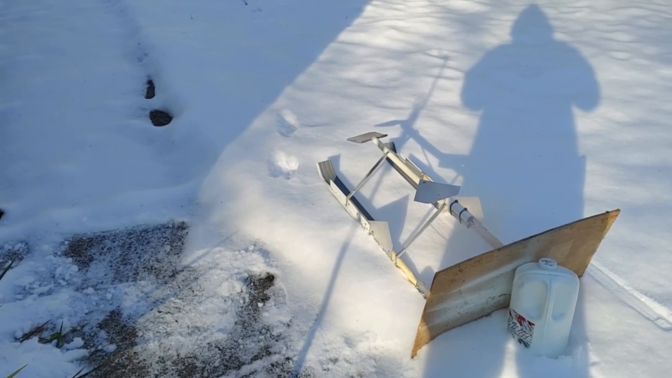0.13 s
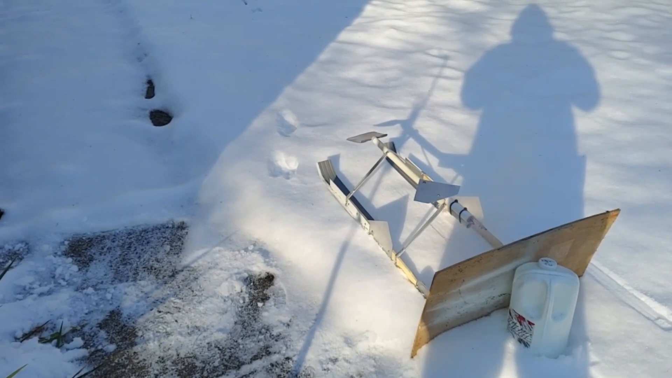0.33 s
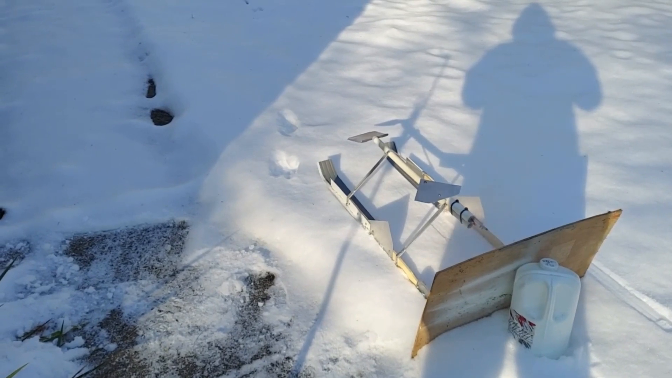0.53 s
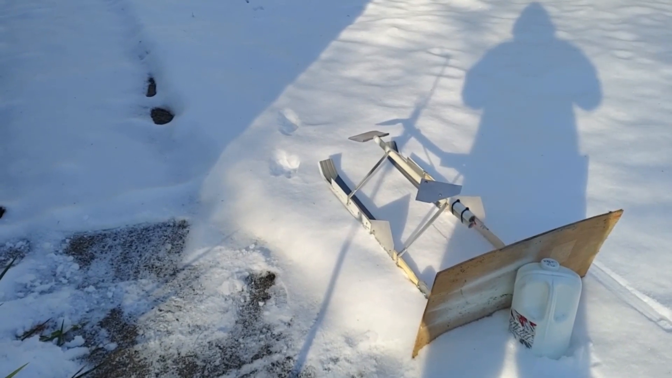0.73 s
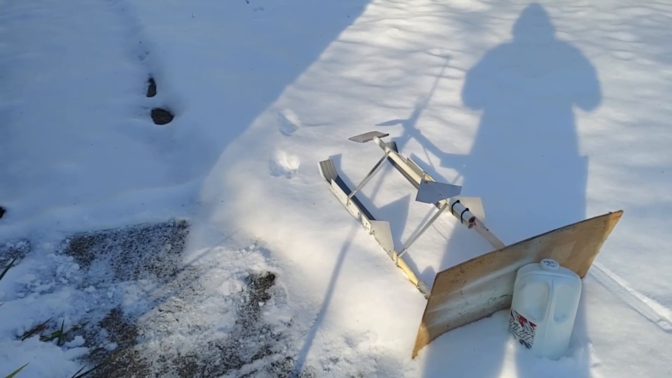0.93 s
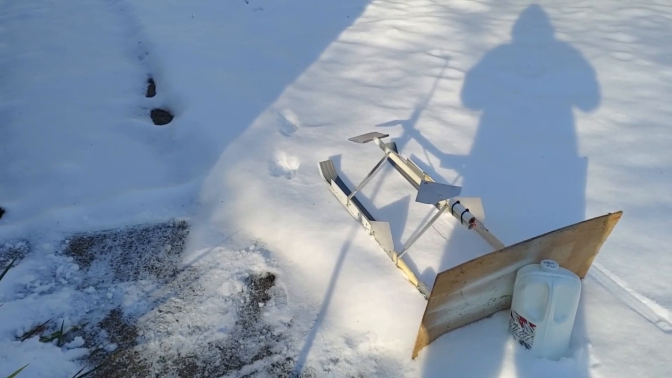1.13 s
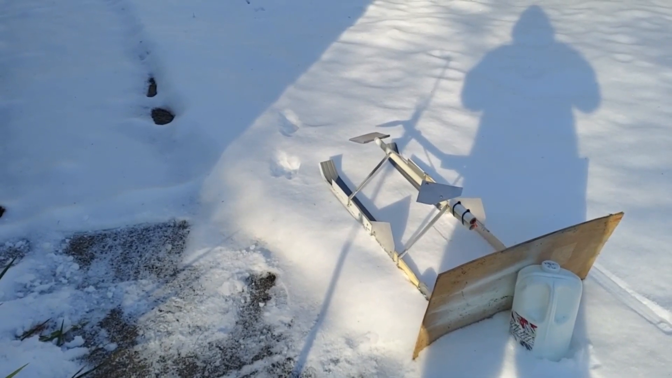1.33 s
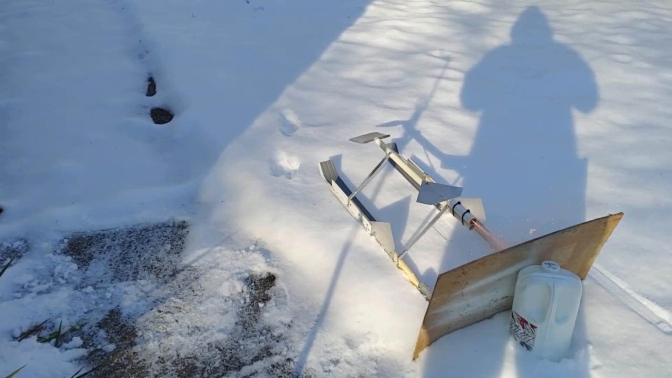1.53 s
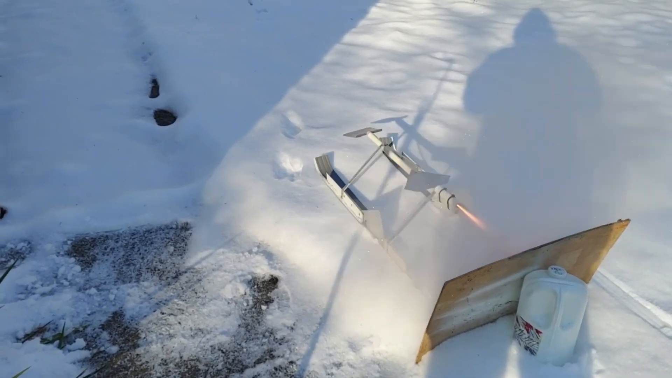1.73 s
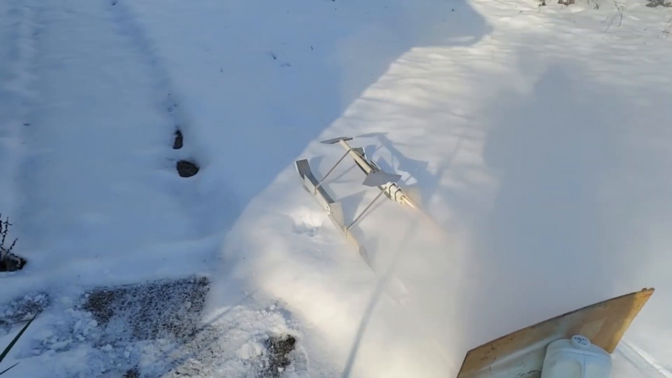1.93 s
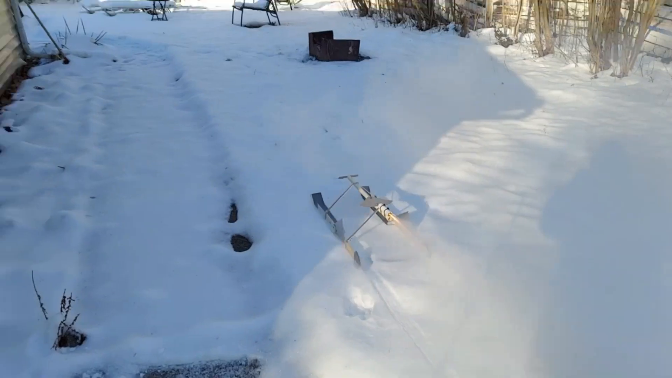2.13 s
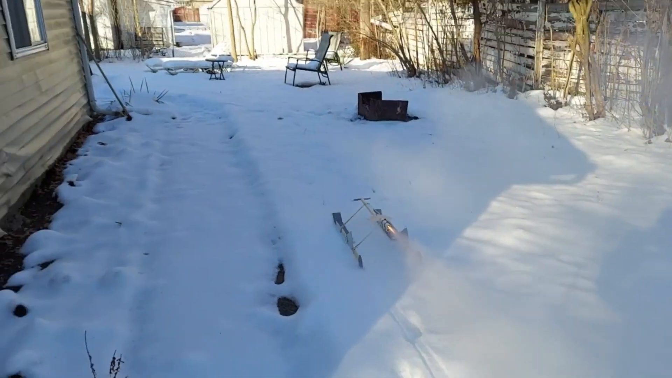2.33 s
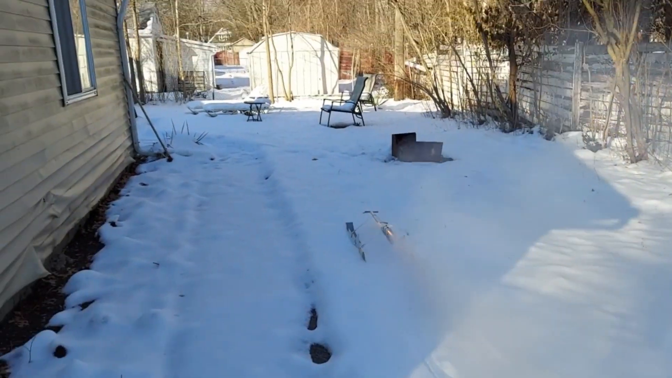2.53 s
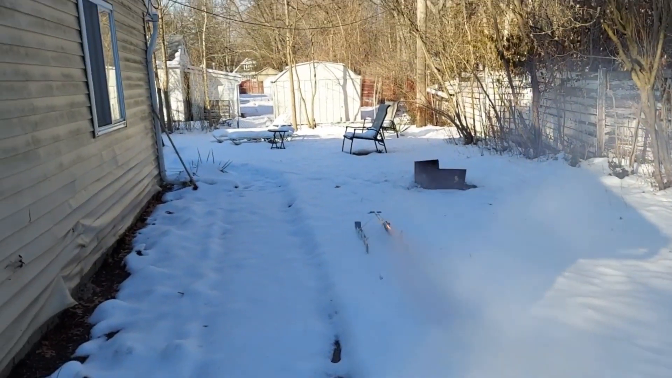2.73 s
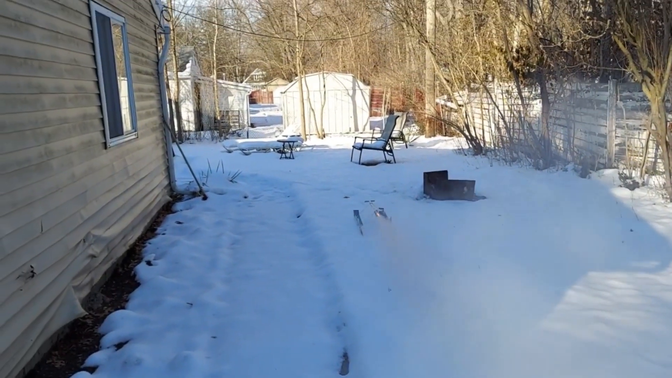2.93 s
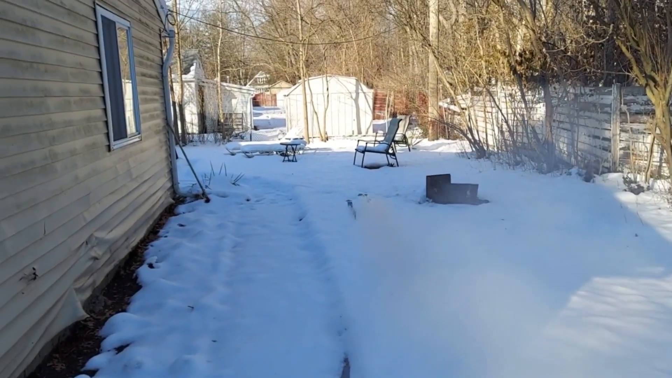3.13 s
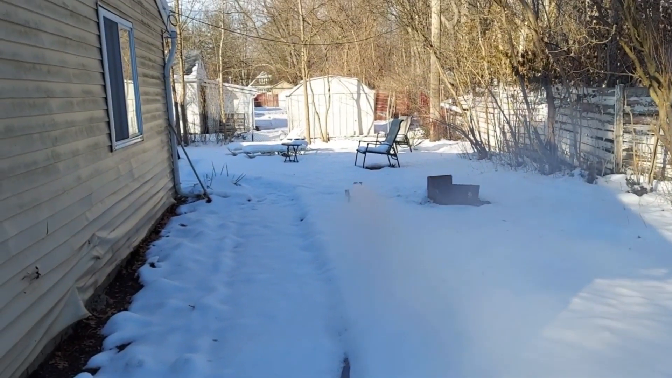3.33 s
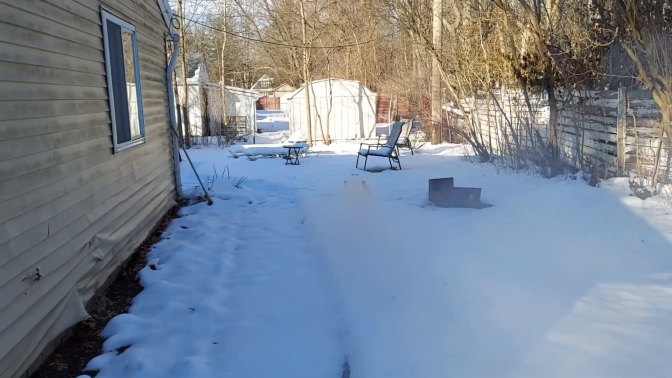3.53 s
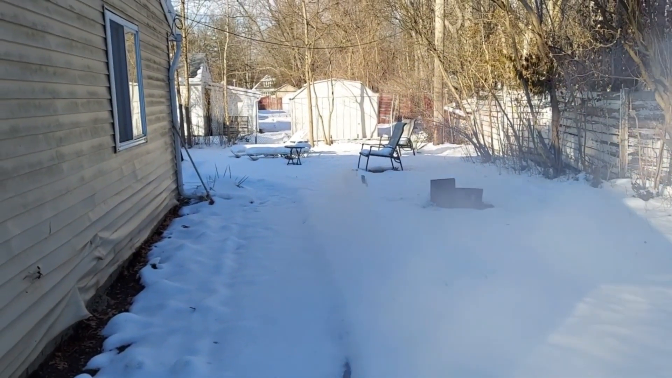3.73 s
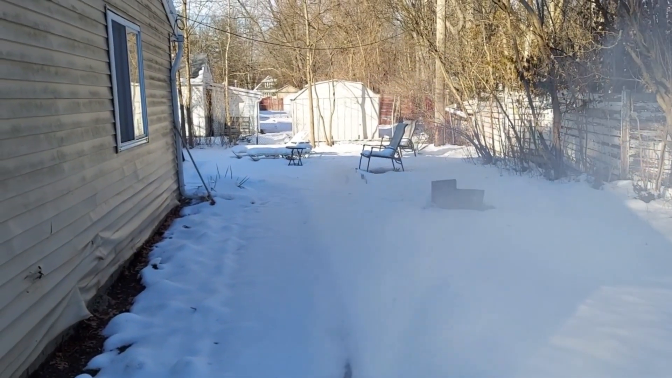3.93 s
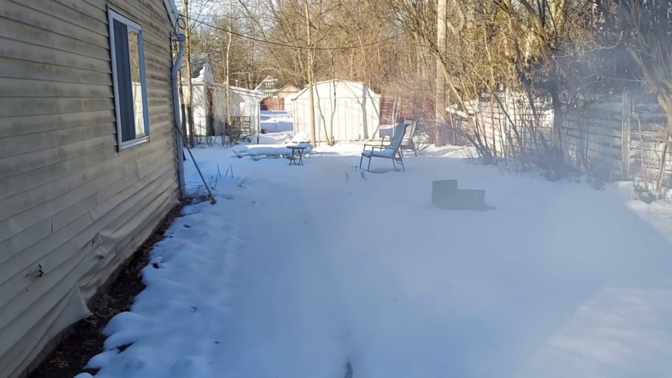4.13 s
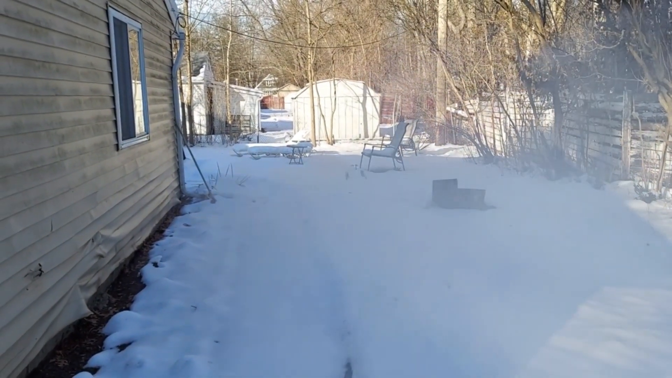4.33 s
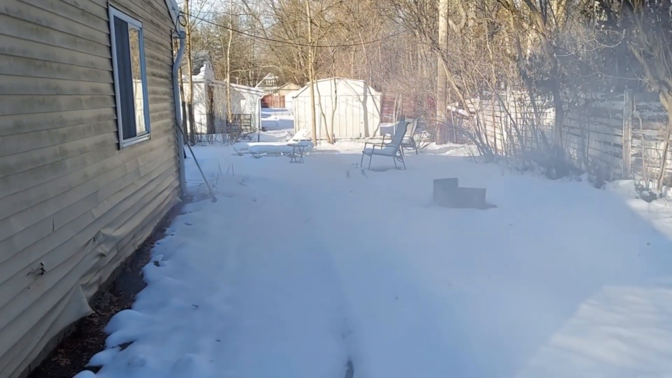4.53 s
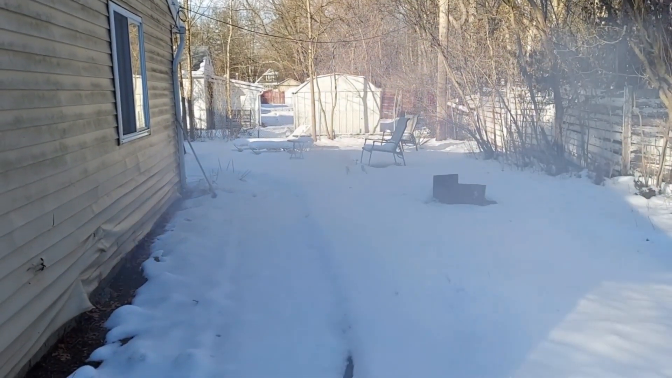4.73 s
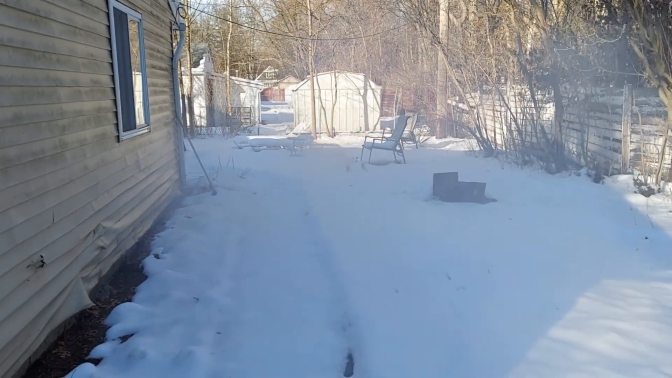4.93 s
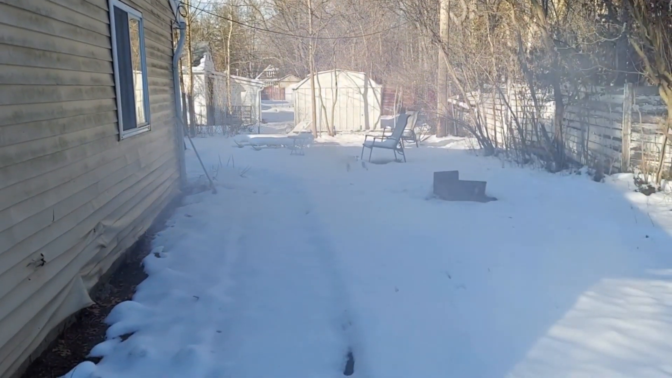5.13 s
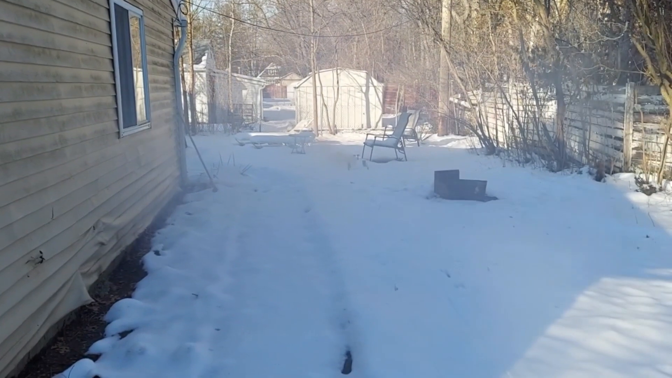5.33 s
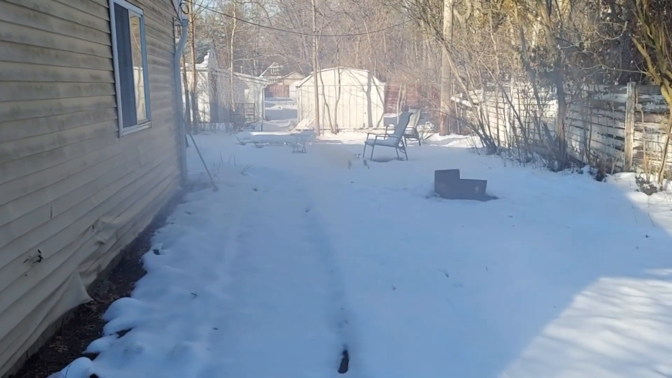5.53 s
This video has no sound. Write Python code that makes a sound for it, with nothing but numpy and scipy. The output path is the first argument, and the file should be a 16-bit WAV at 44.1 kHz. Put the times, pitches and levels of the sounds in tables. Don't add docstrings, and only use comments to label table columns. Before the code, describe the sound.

A handheld stereo microphone close to a small rocket on snow catches soft breeze thuds and a weak fizz, then a sharp flare and a violent broadband blast with exhaust buffeting both sides. The buffeting clears first on the right, then on the left, leaving a cleaner receding hiss. Burnout is sudden, with a short yard echo; automatic gain slowly restores low rumble, wind puffs and a distant smouldering hiss.

```python
import sys
import numpy as np
from scipy import signal
from scipy.fft import rfft, irfft, next_fast_len
from scipy.io import wavfile
from scipy.ndimage import uniform_filter1d

SR = 44100
rng = np.random.default_rng(int(sys.argv[2]) if len(sys.argv) > 2 else 0)


def int16_out(signal):
    q = np.round(np.clip(np.atleast_2d(signal).T, -1, 1) * 32767)
    wavfile.write(sys.argv[1], SR, q.astype(np.int16))


def makeup_ratio(level_db):
    decades = np.asarray(level_db, float) / 20
    return 10 ** decades


N = 246651
LIGHT_S, BURNOUT_S = 1.6, 3.372
TOP_HZ = 15760


def since(s):
    return np.arange(N) / SR - np.array(s)[..., None]


def per_port(left_right):
    return np.array(left_right)[:, None]


def in_time(rows):
    s, *columns = np.transpose(rows)
    return np.array([np.interp(np.arange(N) / SR, s, c) for c in columns])


def rms_one(x):
    return x / np.sqrt(np.mean(x ** 2, axis=-1, keepdims=True) + 1e-20)


def filtered(x, order, hz, kind):
    return signal.sosfilt(signal.butter(order, hz, kind, fs=SR, output="sos"), x)


def drift(rate_hz, channels=1):
    r = np.exp(-2 * np.pi * rate_hz / SR)
    noise = rng.standard_normal((channels, N + SR))
    return rms_one(signal.lfilter([1], [1, -2 * r, r * r], noise)[:, SR:])


def delayed(x, ms):
    return np.interp(np.arange(N) - ms * SR / 1000, np.arange(N), x)


def pair(alike, left_lag_ms):
    common, *own = rng.standard_normal((3, N))
    lag = np.round(left_lag_ms * SR / 1000 + np.zeros(N)).astype(int)
    both = np.array([common[(np.arange(N) - lag) % N], common])
    return np.sqrt(alike) * both + np.sqrt(1 - alike) * np.array(own)


def coloured(x, colour, falls_db_oct=7.0):
    size = next_fast_len(N)
    hz = np.arange(1, size // 2 + 2) * SR / size
    points_hz, *columns_db = np.transpose(colour)
    level_db = np.array([np.interp(np.log(hz), np.log(points_hz), c) for c in columns_db])
    level_db = level_db + falls_db_oct * np.minimum(np.log2(hz / points_hz[0]), 0)
    spectrum = rfft(x, size) * makeup_ratio(level_db) * (hz < TOP_HZ)
    return rms_one(irfft(spectrum, size)[:, :N])


def gate(start_s, end_s, rise_s=0.011, fall_s=.02):
    corners_s = [start_s - rise_s, start_s, end_s, end_s + fall_s]
    return np.sqrt(np.interp(np.arange(N) / SR, corners_s, [0, 1, 1, 0]))


def lifts(rows, db_per_s):
    return sum(np.maximum(db - db_per_s * abs(since(s)), 0) for s, db in rows)


def peaks_over(bed_db, rows):
    level_db = bed_db + np.zeros((2, N))
    for s, left_db, right_db, fall_s in rows:
        peak_db = per_port([left_db, right_db]) - 20 * abs(since(s)) / fall_s
        level_db = np.maximum(level_db, peak_db)
    return level_db


# time in seconds, level in dB.
FIZZ = [
    (0.05, -65),
    (0.42, -63),
    (0.85, -60.5),
    (1.21, -56.3),
    (1.418, -55),
    (1.45, -25.5),
    (1.48, -17.5),
    (1.51, -20.5),
    (1.55, -15.2),
]
# frequency in Hz, left and right density in dB per Hz.
FIZZ_COLOUR = [(300, -22, -24), (890, -18.5, -21), (1640, -10.5, -13.5), (2720, -25.5, -26.5),
               (3150, -12.5, -10.5), (4630, -12, -12.5), (5150, -11, -25), (7520, -12.5, -4.5),
               (8400, -18.5, -18.5), (10400, -4.5, -16.5), (11500, -9.5, -13), (12200, -7, 0.5),
               (12800, -2.5, 1.5), (15600, 2.5, -10)]
# frequency in Hz, left-right likeness 0-1, left lead in radians.
FIZZ_PORTS = [(300, .8, -1.1), (1500, .85, -0.4), (2300, .1, -1), (3110, .985, -3), (4600, 1, -3),
              (5300, .4, -4.5), (7010, .6, -5.5), (8000, .6, -4.5), (10900, .7, -8.5), (11700, .3, -8.5),
              (12500, 0.9, -9), (14800, .85, -8.5), (15800, .7, -9.5)]
# time in seconds, left and right level in dB, seconds to fall 20 dB.
CRACKLES = [
    (.27, -71, -71, .33),
    (.35, -66, -67, .33),
    (.52, -69, -70, .33),
    (1.1, -71, -76, .4),
    (1.46, -38, -38, .02),
]


def igniter():
    spit_db, spit_db_per_s = 3.0, 150
    hz = np.arange(N // 2 + 1) * SR / N
    points_hz, alike, lead_rad = np.transpose(FIZZ_PORTS)
    alike = np.interp(hz, points_hz, alike)
    lead_rad = np.interp(hz, points_hz, lead_rad)
    common, *own = rfft(rng.standard_normal((3, N)))
    shared = np.array([common * np.exp(1j * lead_rad), common])
    ports = np.sqrt(alike) * shared + np.sqrt(1 - alike) * np.array(own)

    left_over_right_db = np.where(since(FIZZ[-2][0]) < 0, .3, 1.5)
    level_db = in_time(FIZZ) + left_over_right_db * per_port([.5, -.5])
    level_db = level_db + lifts([(row[0], spit_db) for row in CRACKLES[:2]], spit_db_per_s)
    hiss = coloured(irfft(ports, N), FIZZ_COLOUR) * makeup_ratio(level_db + 1.0 * drift(25) - .5)

    rustle = rms_one(filtered(pair(alike=.3, left_lag_ms=.12), 3, [2900, 5600], "band"))
    rustle_db = peaks_over(per_port([-76.5, -78.5]), CRACKLES)
    rustle = rustle * makeup_ratio(rustle_db + 2.0 * drift(30))
    return (hiss + rustle) * gate(-1, 1.607, fall_s=0.019)


# time in seconds, gain in dB.
GAIN = [
    (0, -56),
    (1.42, -53),
    (1.62, -69),
    (3.5, -87),
    (4.0, -79),
    (4.45, -77.5),
    (4.7, -66.5),
    (4.95, -57),
    (5.3, -53),
]
# frequency in Hz, left and right density in dB per Hz.
YARD_COLOUR = [(40, -6.5, -11), (90, -3, -5), (180, -2, 1), (930, -13, -12), (1550, -21.5, -18.5),
               (2050, -32.5, -36.5), (2460, -46, -45), (5000, -51, -52), (16000, -51, -55)]


def yard():
    rumble = coloured(pair(alike=0.77, left_lag_ms=.1), YARD_COLOUR)
    return rumble * makeup_ratio(in_time(GAIN) + 1.0 * drift(4))


# time in seconds, left and right level in dB, seconds to fall 20 dB.
BREEZE = [(.02, -64, -52, .3), (.18, -52, -55, .2), (.26, -41.5, -45.5, .15), (.34, -41, -48, .11),
          (.47, -49, -58, .15), (.54, -44.5, -57, .12), (.59, -63, -51.4, .25), (.7, -54, -57, .2),
          (.78, -52, -50, .15), (1.1, -45, -58, .1), (1.2, -60, -56, .3), (1.4, -56, -58, .3),
          (1.5, -42.5, -42, .08), (1.57, -43, -61, .05), (3.82, -90, -74, .3), (4.11, -81, -64, .12),
          (4.2, -59, -77.5, .09), (4.48, -54.5, -76, .1), (4.59, -52, -70, .12), (4.92, -63, -56.7, .12),
          (5.16, -49, -52, .09), (5.29, -74, -42, .16), (5.37, -60, -45, .12), (5.44, -45.5, -47.3, .13),
          (5.52, -47, -52, .08), (5.58, -62, -47, .1)]
# time in seconds, left and right level in dB, seconds to fall 20 dB.
PUFFS = [(1.622, -18, -19.5, .08), (2.04, -22, -26, .4), (2.39, -26, -21, .3), (2.8, -17.5, -42, .2),
         (2.87, -15.5, -42, .14), (2.93, -18.5, -17.5, .055), (3.03, -40, -28, .03), (3.07, -29, -13, .04),
         (3.105, -33, -21.5, .1), (3.17, -39, -40, .07), (3.31, -33, -59, .03), (3.41, -55, -58, .05)]


def air_level():
    blast_db, blast_db_per_s = per_port([-28, -25.5]), per_port([5.0, 1.5])
    blast_ends_s, edge_db_per_s = [2.97, 2.755], 420
    calm_db = in_time(GAIN) - 7.0
    outside_s = np.maximum(-5.0 * since(LIGHT_S + .012), since(blast_ends_s))
    outside_s = np.maximum(outside_s, 0)
    blast_db = blast_db + blast_db_per_s * since(LIGHT_S) - edge_db_per_s * outside_s
    unlit = since(LIGHT_S) <= 0
    gusts_db = peaks_over(np.maximum(calm_db, blast_db), BREEZE)
    puffs_db = peaks_over(-200, PUFFS) - 200 * unlit
    return np.maximum(gusts_db, puffs_db)


# time in seconds, eddies per second.
EDDIES = [
    (1.6, 615),
    (2.4, 500),
    (2.8, 260),
    (3.2, 175),
]


def air():
    level_db, per_s = air_level(), in_time(EDDIES)
    lumps = filtered(rng.standard_normal((2, N)), 2, [36, 95], "band")
    lumps = rms_one(lumps * makeup_ratio(1.9 * drift(14, channels=2)))
    wake = rms_one(filtered(rng.standard_normal((2, N)), 2, [60, 190], "band"))

    sizes = makeup_ratio(2.3 * np.minimum(rng.exponential(1, (2, N)), 3))
    sizes = sizes * rng.choice([-1, 1], (2, N))
    arrives = rng.random((2, N)) < per_s / SR
    pushes = sizes * arrives / np.sqrt(per_s) + 1e-18
    pushes = filtered(pushes, 1, [120, 420], "band")
    pushes = rms_one(filtered(pushes, 2, [60, 1100], "band"))

    fast = np.clip((level_db + 46) / 15, 0, 1)
    sharp = np.clip((level_db + 44.5) / 25, 0, .82)
    stream = np.sqrt(1 - sharp) * wake + np.sqrt(sharp) * pushes
    return makeup_ratio(level_db) * (np.sqrt(1 - fast) * lumps + np.sqrt(fast) * stream)


# time in seconds, port (0 left, 1 right), push +1 or pull -1,
# peak in dB, swing in Hz.
SLAPS = [(1.598, 1, 1, -20, 202), (1.606, 0, -1, -16, 200), (1.609, 1, 1, -6, 120),
         (1.62, 0, -1, -3.5, 152), (1.625, 1, -1, -12, 250), (2.714, 1, 1, -12.5, 300),
         (2.732, 1, -1, -13.5, 250), (2.768, 1, 1, -15, 250), (2.921, 1, 1, -16.5, 200),
         (2.935, 1, 1, -11, 300), (2.952, 0, 1, -8.5, 250), (2.994, 0, 1, -11, 200),
         (3.007, 0, -1, -13, 120), (3.029, 1, -1, -20, 250), (3.068, 1, 1, -6.5, 300),
         (3.093, 0, 1, -14, 300), (3.094, 1, -1, -10, 278), (3.098, 0, -1, -12, 130),
         (3.103, 1, -1, -11, 300), (3.117, 1, 1, -14, 250), (3.129, 0, 1, -19, 200),
         (3.135, 1, 1, -20, 250), (3.297, 0, -1, -28, 120), (3.311, 0, 1, -22, 200)]


def slaps():
    out, t = np.zeros((2, N)), np.arange(SR // 20) / SR
    for s, port, sign, peak_db, hz in SLAPS:
        swing = np.cos(2 * np.pi * hz * t) * np.exp(-1.2 * hz * t)
        swing = swing * (1 - np.exp(-t / .0003))
        at = round(s * SR)
        out[int(port), at:at + len(t)] += sign * makeup_ratio(peak_db + 1.5) * swing
    return out


# time in seconds, level in dB.
THRUST = [
    (1.59, -17),
    (1.75, -15.7),
    (1.97, -16.5),
    (2.05, -14.8),
    (2.35, -14.7),
    (2.81, -16),
    (3.09, -15),
    (3.31, -17.5),
    (3.37, -22),
]


def jet_level(gone):
    after_s = np.maximum(since(BURNOUT_S), 0)
    thrust = makeup_ratio(in_time(THRUST) - 900 * after_s)
    near_echo = makeup_ratio(-33 - 140 * after_s)
    far_echo = makeup_ratio(per_port([-50, -51.5]) - 12 * after_s)
    loss_db = per_port([5.5, 7.0]) * gone
    return np.sqrt(thrust ** 2 + near_echo ** 2 + far_echo ** 2) * makeup_ratio(-loss_db)


# frequency in Hz, left and right density in dB per Hz.
ROAR_COLOUR = [(780, -0.5, -1.5), (3960, -4, -3.5), (5500, -5.5, -9.5), (7410, -10.5, -6), (7860, -9.8, -7),
               (8200, -13, -17), (9100, -20, -19), (10540, -6.5, -13), (11460, -5.5, -7.5),
               (11970, -5.5, -4), (12660, -5, -1.5), (14200, -4.5, -5), (14900, -1.8, -6.5),
               (15590, 1, -6.5)]
FAR_COLOUR = [(339, -17, -21.5), (688, -20, -22), (1550, -3.5, -4), (2240, -2, -15.5), (3190, -8, -3.5),
              (4660, -6, -7.5), (5260, -4, -8.5), (6120, -9.5, -9), (8010, -5, -7), (9150, -18.5, -20),
              (9680, -15, -20), (12500, 1, -6), (14380, -7.5, -6.5), (15590, -3, -13.5)]
ECHO_COLOUR = [(340, -15, -15.5), (690, -17, -16), (1830, 1, -1.5), (2314, -8, -17), (3140, -5, 0.5),
               (4820, -2.5, -8), (6200, -9.5, -10), (7750, -5, -5.5), (8150, -5, -8), (9220, -19.5, -22),
               (9850, -14, -21.5), (11280, -5.5, -10.5), (12160, -5, -8.5), (15590, -1, -9.5)]


def jet():
    leaves_s, leaves_over_s = [2.97, 2.35], [.07, .09]
    gone = np.clip(since(leaves_s) / per_port(leaves_over_s), 0, 1)
    turning = np.clip(1.1 * (since(leaves_s[1]) - leaves_over_s[1]), 0, 1)
    far_at_most = np.where(since(BURNOUT_S) < 0, .985, .93)
    far = np.clip(np.maximum(gone, turning + .15 * (1 - gone[1])), 0, far_at_most)
    echo_s = [leaves_s[1], leaves_s[0], BURNOUT_S, BURNOUT_S + .12]
    echo = np.interp(since(0), echo_s, [0, .3, .3, .8])

    slid_s = np.clip(since(LIGHT_S), 0, BURNOUT_S - LIGHT_S)
    lag_ms = .2 - .52 * slid_s
    snow_ms = 2.55 - .72 * slid_s
    closest_s = 1.75
    treble_db = np.maximum(3.5 - 14 * abs(since(closest_s)), -3.2)
    treble_db = treble_db + 7.0 * turning

    roar = coloured(pair(alike=0.11, left_lag_ms=lag_ms), ROAR_COLOUR, falls_db_oct=0.0)
    treble = signal.sosfiltfilt(signal.butter(2, 7500, "high", fs=SR, output="sos"), roar)
    roar = roar + (makeup_ratio(treble_db) - 1) * treble
    roar = roar * makeup_ratio(0.88 * drift(150, channels=2))
    direct = pair(alike=0.41, left_lag_ms=lag_ms)
    bounced = direct + .36 * np.array([delayed(x, snow_ms) for x in direct])
    hiss = coloured(bounced, FAR_COLOUR, falls_db_oct=2.5)
    tail = coloured(pair(alike=.2, left_lag_ms=-0.13), ECHO_COLOUR, falls_db_oct=2.5)

    mix = np.sqrt(1 - far) * roar + np.sqrt(far * (1 - echo)) * hiss + np.sqrt(far * echo) * tail
    level = jet_level(np.maximum(gone, .5 * turning))
    flicker_db = 0.64 * drift(9) + 0.81 * drift(40)
    return mix * level * makeup_ratio(flicker_db + 0.5) * gate(1.625, 3.89, rise_s=.018, fall_s=0.52)


def mottled(x):
    patch_db, patch_hz, patch_s, size = 1.8, 350, .06, 512
    frames = signal.stft(x, nperseg=size)[2]
    field = rng.standard_normal(frames.shape)
    for _ in range(2):
        field = uniform_filter1d(field, max(round(patch_hz * size / SR), 1), axis=1)
        field = uniform_filter1d(field, max(round(2 * patch_s * SR / size), 1), axis=2)
    gain = makeup_ratio(patch_db * field / field.std())
    return signal.istft(frames * gain / np.sqrt(np.mean(gain ** 2)), nperseg=size)[1][:, :N]


# frequency in Hz, left and right density in dB per Hz.
SMOULDER_COLOUR = [(946, -14.5, -14.5), (1760, -7.5, -10.5), (2240, -8, -22), (2600, -14.5, -5.5),
                   (3330, -0.5, 2.5), (3960, -2.5, 0), (5000, 0, -10), (6820, -16, -10), (7750, -7.5, -9.5),
                   (8910, -21, -21), (9880, -18, -28), (11600, -8, -10.5), (13570, -9, -9.5),
                   (15570, -5, -16)]
# time in seconds, lift in dB.
SPUTTERS = [
    (4.45, .8),
    (5.15, 3.0),
    (5.23, 3.0),
    (5.33, 2.5),
    (5.43, 4.5),
]


def smoulder():
    full_gain_db, follows_gain = -53, .8
    direct = pair(alike=0.32, left_lag_ms=.0)
    echo = np.array([delayed(direct[0], 2.15), delayed(direct[1], 2.35)])
    echo = filtered(echo, 2, 7000, "low")
    level_db = -44.7 + follows_gain * (in_time(GAIN) - full_gain_db)
    level_db = level_db + lifts(SPUTTERS, db_per_s=60) + 1.1 * per_port([.5, -.5])
    hiss = coloured(direct + 0.53 * echo, SMOULDER_COLOUR, falls_db_oct=0.0)
    return hiss * makeup_ratio(level_db + 1.3 * drift(22) - 0.36) * gate(4.38, 9, rise_s=0.56)


def scene():
    left, right = smoulder() + yard() * gate(3.6, 9)
    right = signal.lfilter(*signal.iirnotch(2210, 7.0, SR), right)
    near = air() + slaps() + yard() * gate(-1, 3.58)
    return igniter() + mottled(jet()) + near + np.array([left, right])


def roll_off(x):
    return signal.sosfilt(signal.butter(12, 16500, fs=SR, output="sos"), x)


def record(dry):
    soft = .82 * np.tanh(dry / .82)
    soft = filtered(soft, 2, 36, "high")
    cut = signal.sosfilt(signal.ellip(10, .1, 60, TOP_HZ, fs=SR, output="sos"), soft)
    return roll_off(cut)


dry = scene()
out = record(dry)
int16_out(out)
```